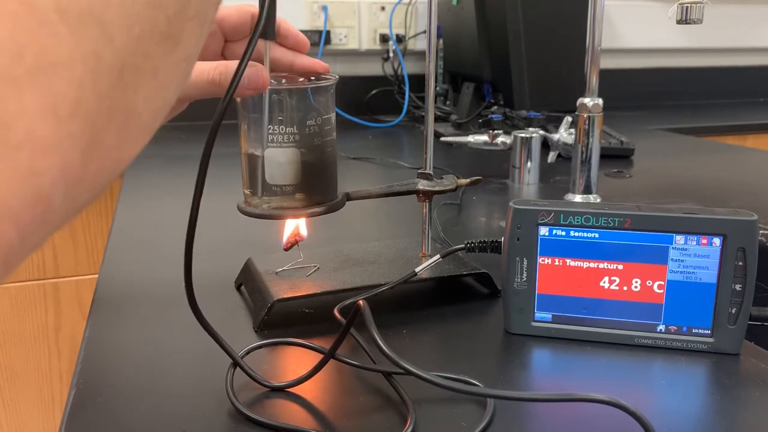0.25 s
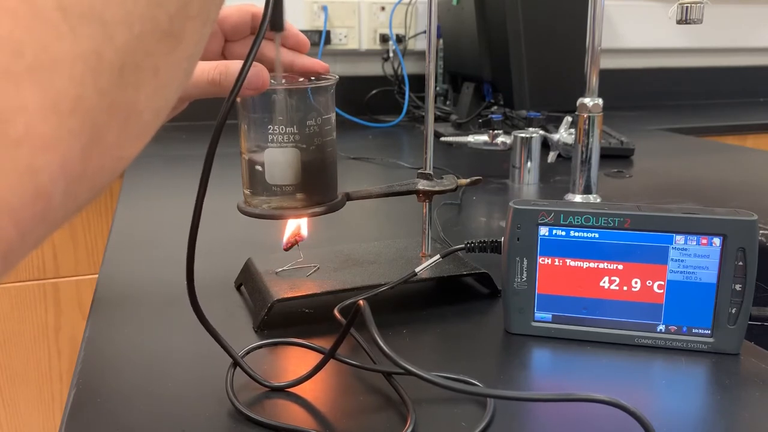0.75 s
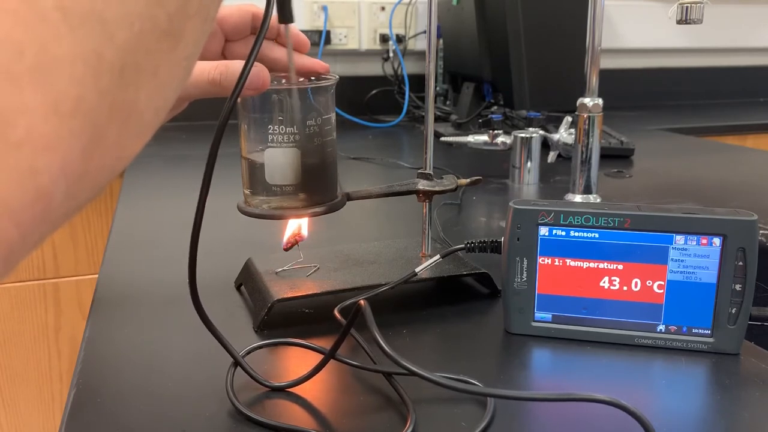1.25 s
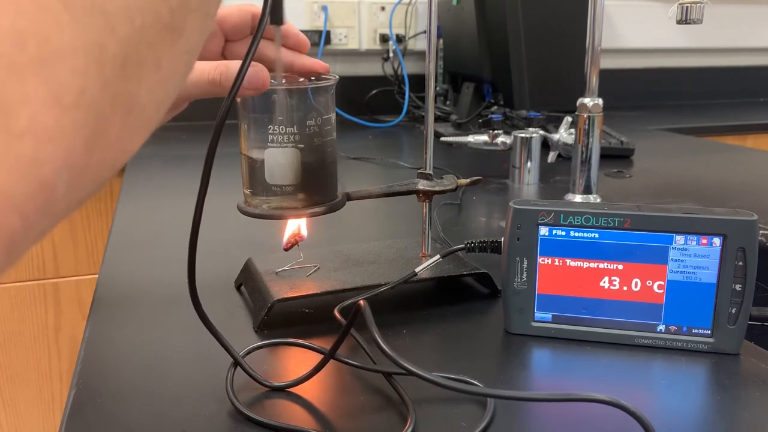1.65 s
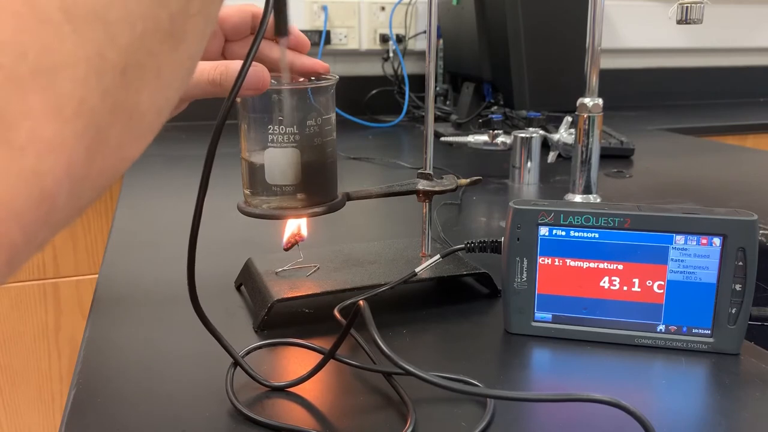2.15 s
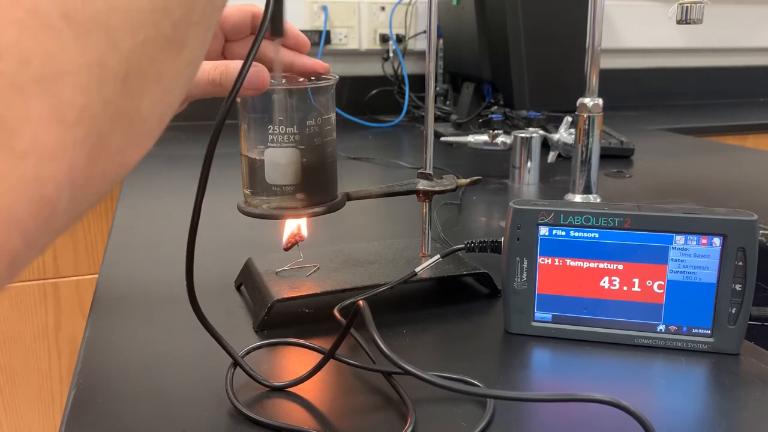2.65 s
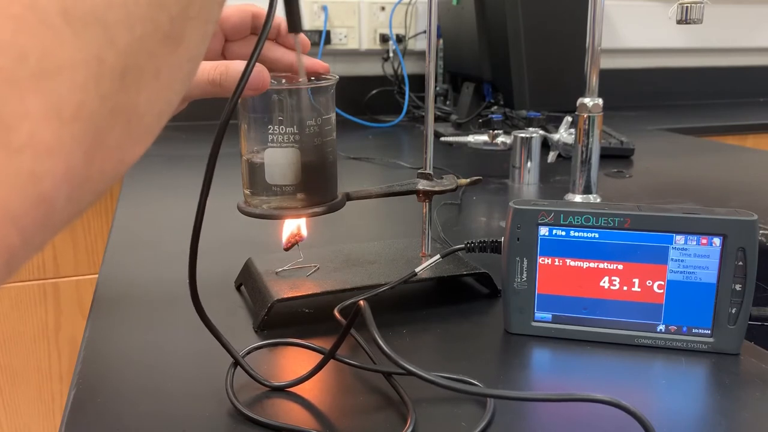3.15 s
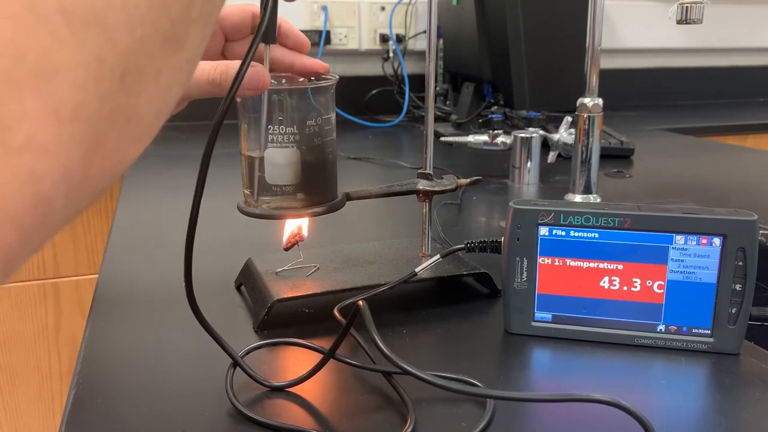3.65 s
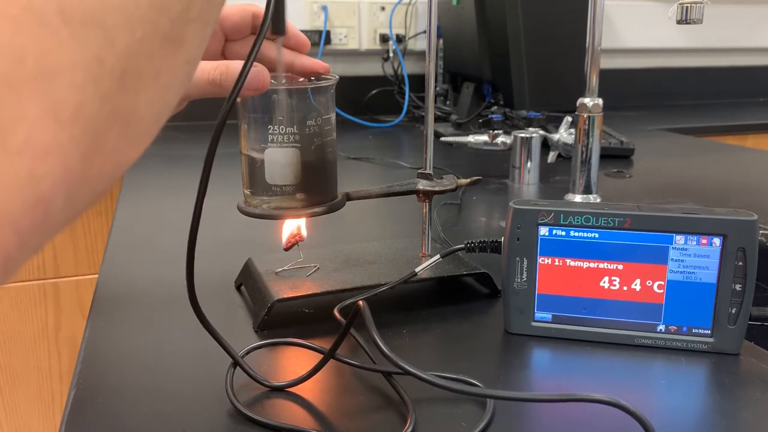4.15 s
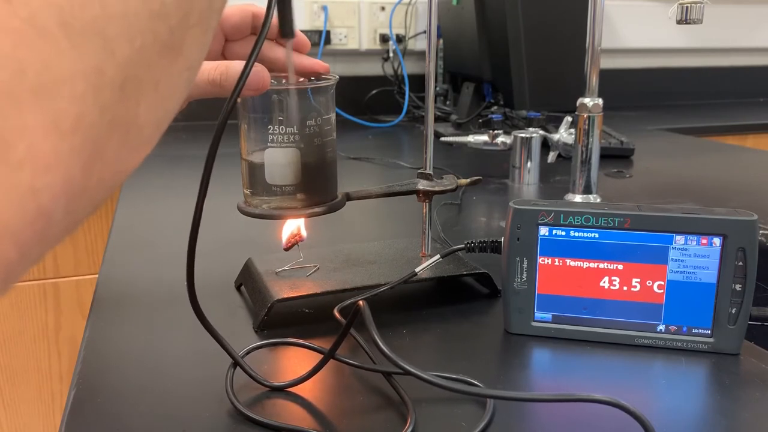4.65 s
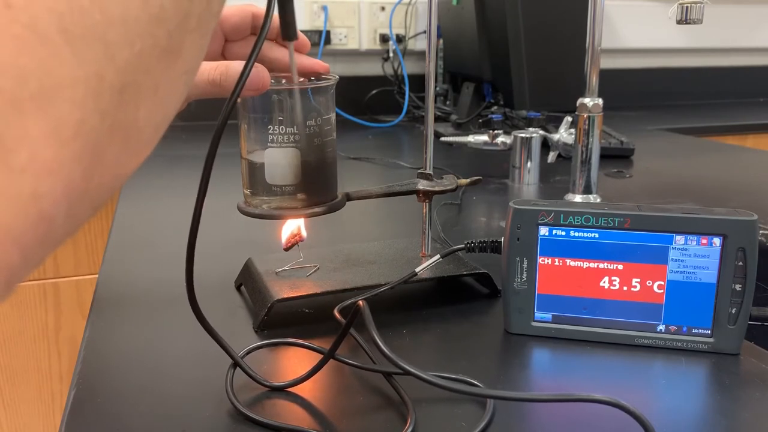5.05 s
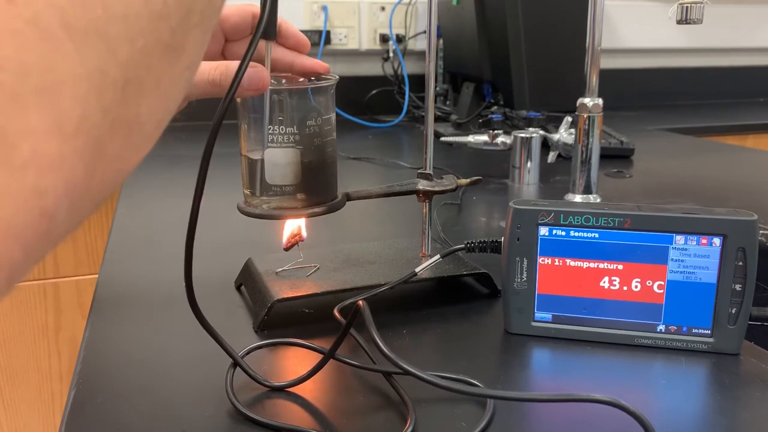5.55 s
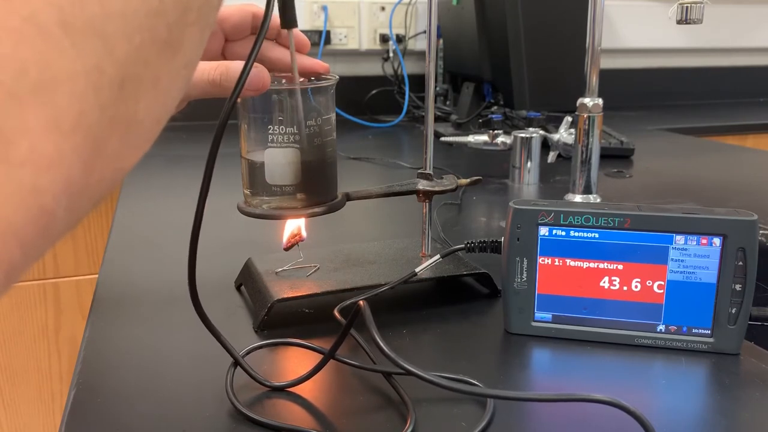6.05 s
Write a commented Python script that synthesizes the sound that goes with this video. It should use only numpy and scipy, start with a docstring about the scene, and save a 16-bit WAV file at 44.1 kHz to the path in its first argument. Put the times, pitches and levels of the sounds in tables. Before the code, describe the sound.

A thin steel probe stirs water in a glass beaker in a classroom lab. Two bright, brittle clinks come early, the first with a tiny bounce, then a lighter one midway, a firm one and finally the loudest, square and ringing. Very faint grazes, water plips and dull ticks fall between. Low ventilation hums throughout. Close microphone, short bright room tail.

```python
"""A steel temperature probe stirs water in a glass beaker and clinks against its wall five times, the
first with a quick bounce: each contact is a noise crack, a dull knock, decaying sines and a shimmer.
Between the clinks the probe grazes the glass (noise bursts), short rising sines give a few faint
water plips and a high rattle of the probe, and there are soft dull ticks (muffled noise). Ventilation
hums steadily (wavering tones, rumble, hiss) in a classroom lab, which adds a short bright tail to the rest."""
import sys
import numpy as np
from scipy import signal
from scipy.fft import rfft, irfft
from scipy.io import wavfile

SR = 44100
rng = np.random.default_rng(int(sys.argv[2]) if len(sys.argv) > 2 else 0)


def put_to_file(sound):
    """Save the sound as 16-bit audio at rate SR, in the file named by the first command-line argument."""
    columns = np.atleast_2d(sound).T  # one column per channel
    safe = np.clip(columns, -1, 1)
    whole_steps = np.round(safe * 32767)
    wavfile.write(sys.argv[1], SR, whole_steps.astype(np.int16))


N = 277383  # length in samples

# Kinds of contact: glancing tip, firm tip, square on the wall, light tip
GLANCING, FIRM, SQUARE, LIGHT = range(4)


def amp(db):
    """Decibels to gain."""
    return 10 ** (np.asarray(db) / 20)


def unit(x):
    """Scales to rms 1."""
    return x / np.sqrt(np.mean(x ** 2) + 1e-20)


def read(points, hz):
    """Reads a (frequency, value) table on a log-frequency axis."""
    f, value = np.transpose(points)
    return np.interp(np.log(hz + 1), np.log(f + 1), value)


def add(mix, start_s, sound):
    """Mixes a sound in at its start time, cut at the end of the mix."""
    part = mix[round(start_s * SR):][:len(sound)]
    part += sound[:len(part)]


def noise(spectrum, size):
    """Noise of rms 1 with the given colour."""
    white = rfft(rng.standard_normal(size))
    hz = np.fft.rfftfreq(size, 1 / SR)
    return unit(irfft(white * amp(read(spectrum, hz)), size))


def drift(rate_hz):
    """Random motion of rms 1, smoothed so that little moves faster than the rate."""
    hz = np.fft.rfftfreq(N, 1 / SR)
    white = rfft(rng.standard_normal(N))
    return unit(irfft(white * np.exp(-(hz / rate_hz) ** 2), N))


def fade(t, t60, rise):
    """Quick rise (time constant in s), then exponential decay by 60 dB in t60 seconds."""
    return (1 - np.exp(-t / rise)) * np.exp(-np.log(1000) * t / t60)


def clinks():
    """Each contact cracks, knocks the stand and rings the modes that its place on the glass favours."""
    # Probe on glass: five clinks, the first with a quick bounce as the second row.
    # Each row: start in seconds, strength in dB, kind of contact.
    contacts = [(1.3950, -8, GLANCING), (1.4085, -22, FIRM), (1.83, -9.5, GLANCING), (3.3740, -10, LIGHT),
                (3.889, -3, FIRM), (5.1184, 0.5, SQUARE)]
    # Ring of beaker and probe. Each row: pitch in Hz, t60 in seconds, then level in dB at strength 0
    # for each kind of contact in turn.
    ring_modes = [(254, 0.22, -34.5, -45.5, -43.5, -51), (503.8, .18, -45, -55.5, -54.5, -61),
                  (572, .16, -50, -60, -68.5, -62.5), (829, .04, -80, -77, -48.5, -88),
                  (977, 0.52, -67.5, -71.5, -69, -76), (1151, 0.012, -52, -31.5, -26.5, -82),
                  (1405, .06, -52, -74.5, -50, -62), (1583, 0.034, -58, -77, -55.5, -59),
                  (1610, .22, -79.5, -85, -63, -84), (1818, .22, -81, -85, -60.5, -82),
                  (1946, .022, -55, -86.5, -36, -56), (3040, .01, -84.5, -44, -49.5, -85),
                  (3149, 0.26, -87, -82, -71, -85), (3386, .42, -85, -78, -63, -85),
                  (3600, .025, -85, -51.5, -48, -63), (3882, .05, -48, -42, -35, -44),
                  (3984, .115, -54, -34.5, -38, -54), (4080, .15, -85, -66, -38, -85),
                  (4122, .22, -85, -63, -38, -85), (4215, .06, -68, -52, -39, -75),
                  (4430, .01, -30, -85, -39, -37.5), (4780, 0.048, -56, -59, -41, -51),
                  (5380, 0.015, -88.5, -44.5, -30, -80), (5816, 0.25, -80, -77.5, -58.5, -81),
                  (5964, .01, -27.5, -30, -28.5, -32.5), (6316, 0.02, -29, -36.5, -44, -29),
                  (6415, .03, -26.5, -30.5, -50, -26), (6490, .13, -48, -57, -57, -46),
                  (6700, .12, -56, -60, -55, -52), (6830, .17, -59, -68, -62, -58),
                  (6950, .031, -42, -48, -42, -39), (7080, .19, -52, -59, -58, -51),
                  (7203, .36, -58, -55, -47, -55), (7324, .46, -72, -70, -52, -70),
                  (7394, .09, -80, -60, -35, -80), (8000, .015, -54.5, -30.5, -70, -61),
                  (8080, 0.015, -46.5, -34, -34.5, -36), (8680, 0.02, -24, -39.5, -34, -24.5),
                  (9060, .009, -22, -17, -36.5, -30), (9270, .017, -37.5, -33.5, -30, -37),
                  (9800, .008, -42.5, -23, -42, -24), (11000, 0.011, -20, -45.5, -83.5, -31),
                  (12300, 0.027, -23, -75, -37.5, -27.5), (13600, .01, -25.5, -67, -40, -44),
                  (13400, 0.016, -49.5, -28.5, -34.5, -36), (14300, 0.011, -16, -32.5, -84, -18),
                  (14500, 0.022, -22, -41.5, -26.5, -32), (15400, .024, -34.5, -29.5, -41.5, -30),
                  (15900, .016, -28.5, -52.5, -84.5, -46)]
    # What each kind of contact gives at strength 0. Each row: crack, knock and shimmer levels in dB.
    contact_levels = [(-13.5, -63, -78.5), (-21.5, -56, -64), (-30.5, -43, -50), (-23, -64, -76)]
    # Sharp crack of steel on glass. Each row: frequency in Hz, relative level in dB.
    crack_colour = [(2500, -25.5), (3500, -30), (5000, -20.5), (6300, -9.5), (7000, -2), (7800, -12),
                    (9000, 6.5), (10300, 1), (11500, -7.5), (13500, 8), (15500, -4), (16500, -12.5)]
    # Duller knock of the beaker in its stand. Each row: frequency in Hz, relative level in dB.
    knock_colour = [(200, -14.5), (500, -4.5), (780, 2), (1400, 3), (2000, -2.5), (2500, -6.5), (3400, -1),
                    (5000, 3), (8000, -4)]
    # Crowd of weak partials around the wall's main ring. Each row: frequency in Hz, relative level in dB.
    shimmer_colour = [(2600, -28.5), (3150, -14.5), (3700, -10.5), (3900, 0), (4150, 4.5), (4350, -4),
                      (4550, -21), (5200, -46.5)]
    knock_growth = 0.31  # dB of knock per dB of strength
    rise_cycles = 3.7  # rise constant of a mode in cycles: the low body blooms after the bright ring

    rings, pings, cracks = np.zeros(N), np.zeros(N), np.zeros(N)
    t = np.arange(SR // 2) / SR
    hz, t60, *mode_db = np.transpose(ring_modes)[:, :, None]
    high = hz[:, 0] > 8000  # the highest modes ping apart, to get a room level of their own
    # Swirling water loads the wall and bends its pitch, by 0.4 % rms
    load = 0.004 * drift(rate_hz=140)

    for start_s, db, kind in contacts:
        crack_db, knock_db, shimmer_db = contact_levels[kind]
        bend = 1 + load[round(start_s * SR):][:len(t)]
        turns = hz * np.cumsum(bend) / SR + rng.random(hz.shape)  # each mode starts at a random phase
        modes = amp(db + mode_db[kind]) * np.sin(2 * np.pi * turns) * fade(t, t60, rise=rise_cycles / hz)
        add(rings, start_s, modes[~high].sum(0))
        add(pings, start_s, modes[high].sum(0))

        shimmer = noise(shimmer_colour, size=len(t)) * fade(t, t60=0.4, rise=0.007)
        add(rings, start_s, amp(shimmer_db + db) * shimmer)
        knock = noise(knock_colour, size=len(t)) * fade(t, t60=0.14, rise=0.0011)
        add(rings, start_s, amp(knock_db + knock_growth * db) * knock)
        crack = noise(crack_colour, size=len(t)) * fade(t, t60=0.005, rise=0.0002)
        add(cracks, start_s, amp(crack_db + db) * crack)
    return rings, pings, cracks


def grazes():
    """A light rub barely stirs the upper ring of the wall, with a thin tick on top."""
    # Probe grazing the wall. Each row: start in seconds, brief ring in dB, thin tick in dB.
    rubs = [(0.42, -67.5, -78), (0.438, -75, -64), (.643, -76.5, -84), (.655, -87, -68), (1.360, -77, -59),
            (2.158, -77, -72), (2.539, -80, -80), (4.068, -90, -63.5), (4.477, -79, -65)]
    # Colour of the brief ring. Each row: frequency in Hz, relative level in dB.
    ring_colour = [(4500, -39), (5800, -14), (6500, -2), (7100, -1.5), (7600, -12), (8200, -4.5),
                   (9500, -29)]
    # Colour of the thin tick. Each row: frequency in Hz, relative level in dB.
    thin_tick_colour = [(5000, -42), (8000, -9), (11500, -13), (12500, -5.5), (14700, 0), (16000, -3)]

    out, t = np.zeros(N), np.arange(SR // 8) / SR
    for start_s, ring_db, tick_db in rubs:
        ring = noise(ring_colour, size=len(t)) * fade(t, t60=0.078, rise=0.0015)
        add(out, start_s, amp(ring_db) * ring)
        thin_tick = noise(thin_tick_colour, size=len(t)) * fade(t, t60=0.02, rise=0.00051)
        add(out, start_s, amp(tick_db) * thin_tick)
    return out


def plips_and_rattle():
    """Short tones ring for a set number of cycles; their pitch wobbles and rises a little."""
    # Short tones: water plips, and near 1.9 s a high rattle of the probe scraping the glass.
    # Each row: start in seconds, level in dB, starting pitch in Hz.
    short_tones = [(0.349, -58, 1954), (0.42, -67, 1810), (0.444, -75, 2070), (0.652, -74.5, 1260),
                   (0.667, -76, 1450), (1.1, -61.5, 1896), (1.102, -61, 3300), (1.362, -70.5, 2270),
                   (1.843, -66.5, 1464), (1.857, -72, 1646), (1.878, -72, 4550), (1.9, -62.5, 4700),
                   (1.925, -75, 4000), (2.092, -62, 2840), (2.094, -63, 3300), (2.183, -56, 1992),
                   (2.186, -63.5, 3650), (2.306, -65.5, 1966), (3.392, -70, 1450), (3.408, -73, 1740),
                   (4.415, -80, 2220), (4.466, -71, 2120)]
    decay_cycles = 90  # cycles to fall by 60 dB, so high tones are shorter
    rise_per_s = 0.4  # share of its pitch that a tone gains per second

    out, t = np.zeros(N), np.arange(SR // 6) / SR
    unrest = 0.05 * drift(rate_hz=400)  # pitch wobble, as a share of the pitch
    for start_s, db, hz in short_tones:
        wobble = unrest[round(start_s * SR):][:len(t)]
        turns = np.cumsum(hz * (1 + rise_per_s * t + wobble)) / SR
        tone = np.sin(2 * np.pi * turns) * fade(t, decay_cycles / hz, rise=0.00049)
        add(out, start_s, amp(db) * tone)
    return out


def ticks():
    """Soft dull ticks: very short noise bursts through a steep low-pass, without any ring or treble."""
    # Soft ticks. Each row: start in seconds, peak level in dB.
    dull_ticks = [(1.5245, -45.5), (2.176, -58), (2.182, -58.5)]
    # Colour of a tick. Each row: frequency in Hz, relative level in dB.
    tick_colour = [(200, 10), (600, 4), (1200, -3.5), (2000, -9)]

    out, t = np.zeros(N), np.arange(SR // 10) / SR
    muffle = signal.butter(6, 2130, fs=SR, output="sos")  # low-pass in Hz
    for start_s, peak_db in dull_ticks:
        burst = noise(tick_colour, size=len(t)) * fade(t, t60=0.012, rise=0.00022)
        tick = signal.sosfilt(muffle, burst)
        add(out, start_s, amp(peak_db) * tick / abs(tick).max())
    return out


def ventilation():
    """Fan tones waver in level and phase over the rumble of the ducts and a faint hiss."""
    # Steady fan tones. Each row: pitch in Hz, rms level in dB.
    fan_tones = [(26.4, -60.5), (70.6, -58), (104, -66.5), (120, -61), (200, -64.5), (263.5, -66),
                 (365, -77)]
    # Colour of the duct rumble. Each row: frequency in Hz, relative level in dB per Hz.
    rumble_colour = [(12, -19), (25, -4.5), (36, -16.5), (52, -4.5), (72, 0.5), (96, 0.5), (125, 4),
                     (150, 3.5), (185, -11), (290, -14.5), (400, -24.5), (500, -36.5), (700, -42),
                     (1200, -69)]
    # Colour of the faint hiss. Each row: frequency in Hz, relative level in dB per Hz.
    hiss_colour = [(500, -11), (900, 1), (1600, -3), (2500, -5), (4700, -5.5), (6000, -8.5), (7500, -13),
                   (8100, -4), (9400, -1.5), (10600, -6), (11700, -33.5), (13200, -3.5), (14800, -12),
                   (15800, -13)]

    t = np.arange(N) / SR
    hum = np.zeros(N)
    for hz, db in fan_tones:
        level = 1 + 0.47 * drift(rate_hz=5.4)
        phase = 2 * np.pi * hz * t + 0.27 * drift(rate_hz=2.6)
        hum += amp(db) * unit(level * np.sin(phase))
    rumble = amp(-46.5) * noise(rumble_colour, size=N)
    hiss = amp(-83.5) * noise(hiss_colour, size=N)
    return hum + rumble + hiss


def room(x, early_db, tail_db):
    """Quick reflections off the bench, then a diffuse tail that builds up and decays by frequency."""
    # Decay of the classroom lab. Each row: frequency in Hz, t60 in seconds.
    room_decay = [(300, 0.4), (1000, 0.46), (3700, 0.48), (7000, 0.38), (10000, 0.2), (15000, 0.26)]

    # Shape the decay of white noise band by band
    hz, frame_s, bands = signal.stft(rng.standard_normal(SR), SR, nperseg=256)
    decay = np.exp(-np.log(1000) * frame_s / read(room_decay, hz)[:, None])
    tail = signal.istft(bands * decay, SR, nperseg=256)[1][:SR]
    t = np.arange(SR) / SR
    tail = tail * (1 - np.exp(-t / 0.011))

    hits = rng.random(SR) < 1500 / SR  # about 1500 reflections per second
    early = rng.standard_normal(SR) * hits * fade(t, t60=0.053, rise=0.0053)
    # Both parts are scaled to unit energy before their levels
    echo = amp(early_db) * early / np.linalg.norm(early) + amp(tail_db) * tail / np.linalg.norm(tail)
    return x + signal.fftconvolve(x, echo)[:N]


def scene():
    """The beaker close by, the room around it; cracks leave the open top and return as a dense splash."""
    rings, pings, cracks = clinks()
    glass = room(rings, early_db=-13, tail_db=-18) + room(pings, early_db=-18, tail_db=-25)
    splash = room(cracks, early_db=-8, tail_db=-9)
    rubs = room(grazes(), early_db=-9.5, tail_db=-14)
    tones = room(plips_and_rattle(), early_db=-2.5, tail_db=-13.5)
    dull = room(ticks(), early_db=-10.5, tail_db=-17.5)
    return (glass + splash + rubs + tones + dull + ventilation())[None]


def record(dry):
    """The recorder's band limit: a steep low-pass at 16.2 kHz."""
    lowpass = signal.firwin(255, 16200, window=("kaiser", 8), fs=SR)
    return signal.oaconvolve(dry, lowpass[None], "same")


dry = scene()
out = record(dry)
put_to_file(out)
```